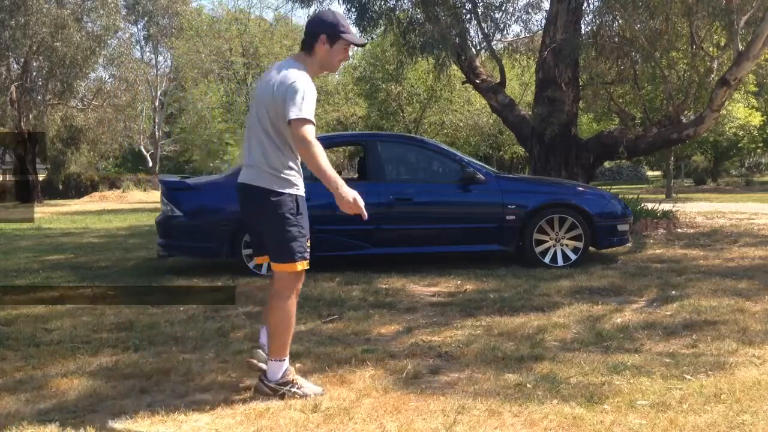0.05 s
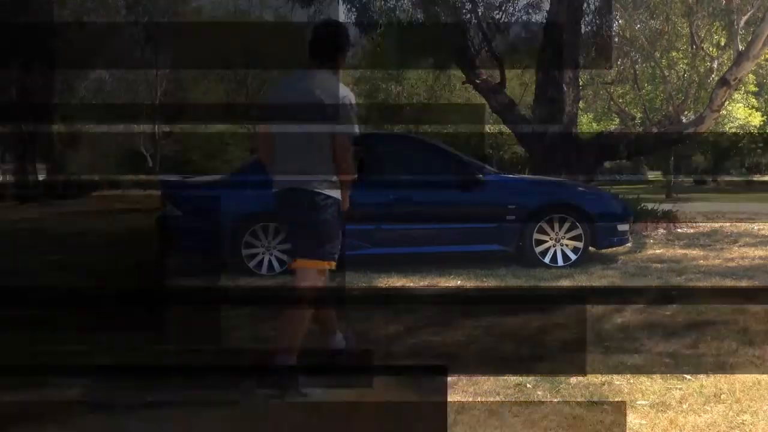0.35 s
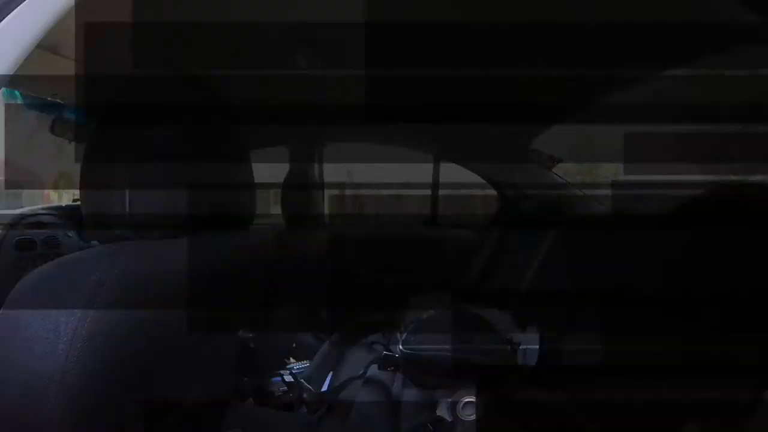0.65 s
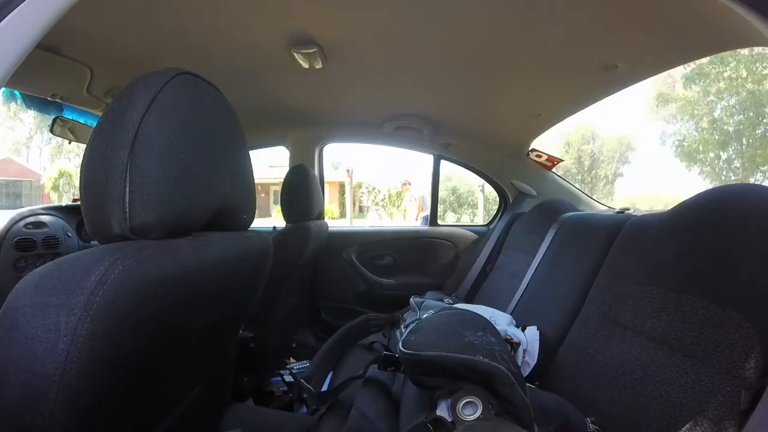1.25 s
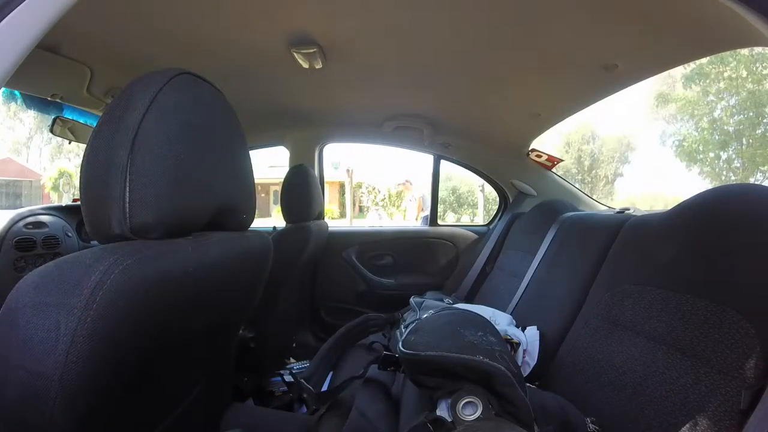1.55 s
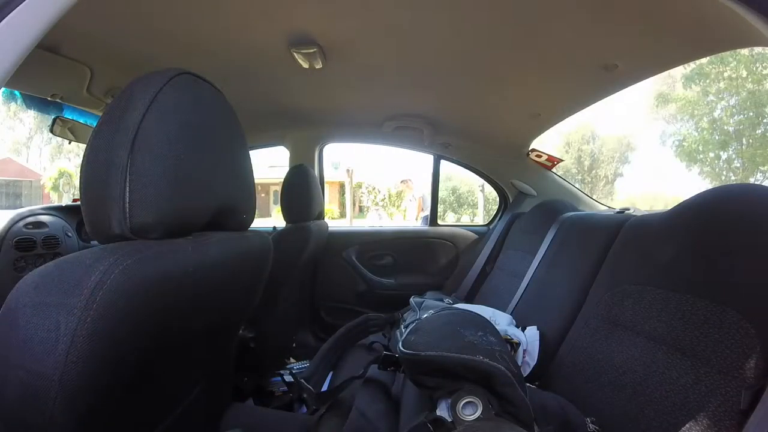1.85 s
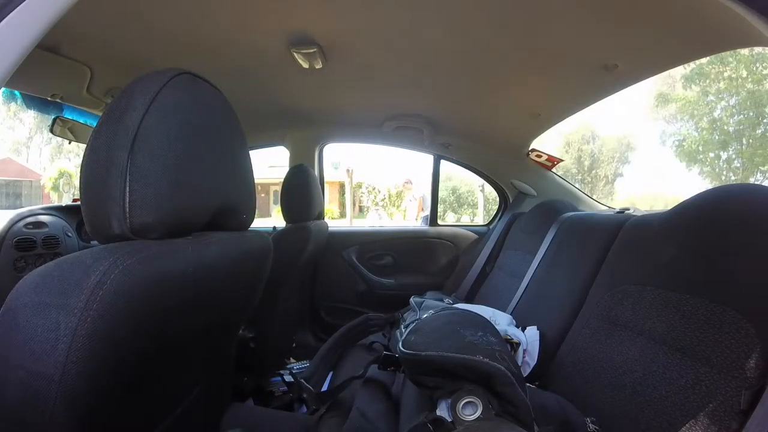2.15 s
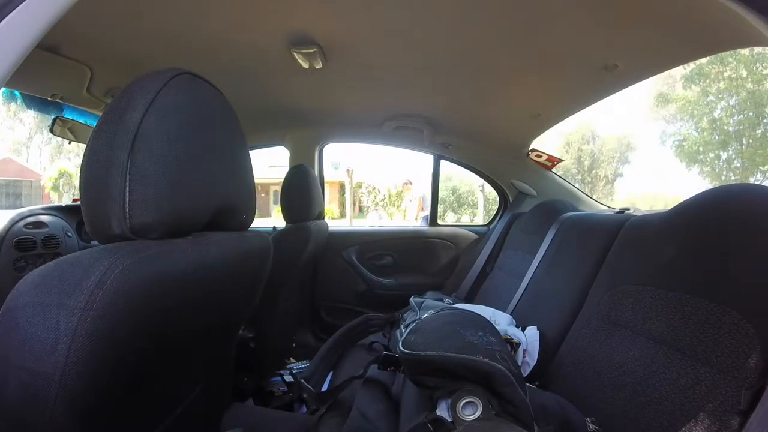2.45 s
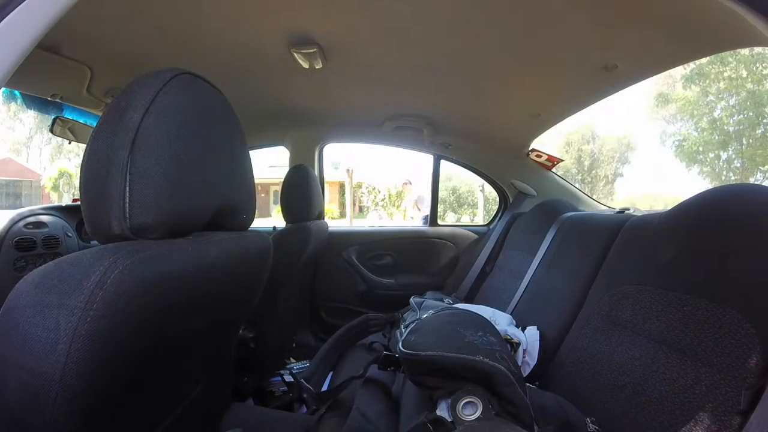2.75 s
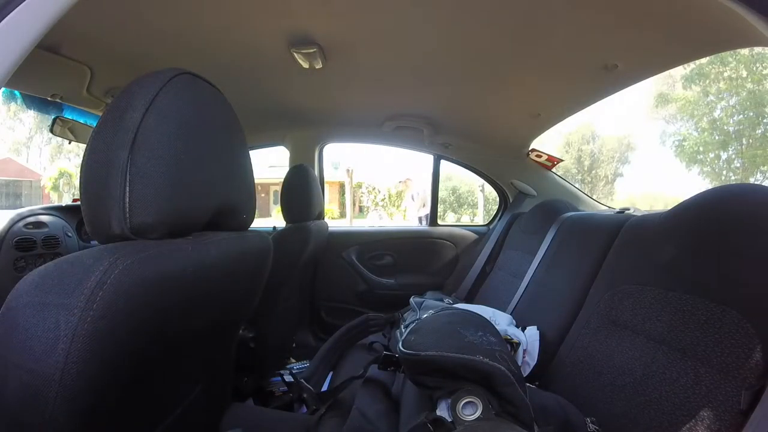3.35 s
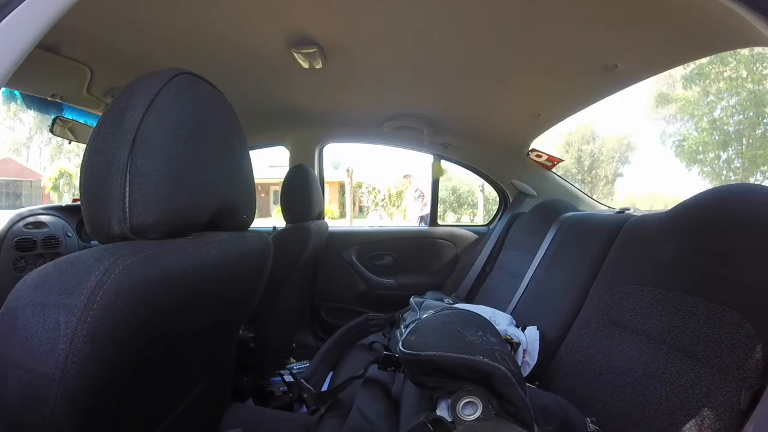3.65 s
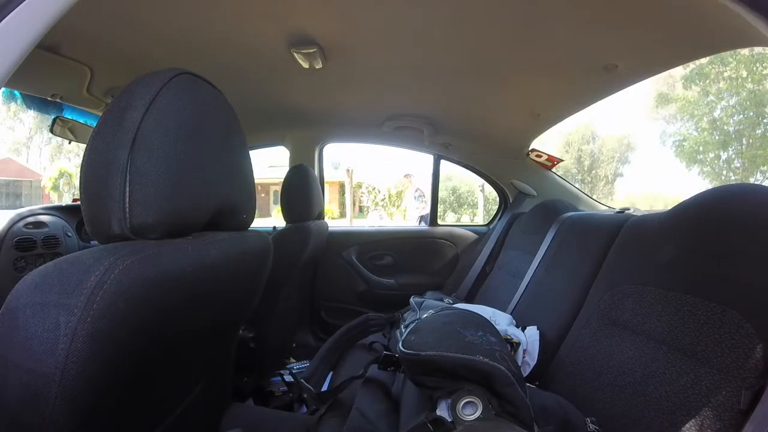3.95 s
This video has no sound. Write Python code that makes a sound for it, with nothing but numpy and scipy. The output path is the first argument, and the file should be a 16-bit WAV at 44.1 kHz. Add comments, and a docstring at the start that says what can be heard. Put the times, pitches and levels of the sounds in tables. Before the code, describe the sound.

From a car seat in a quiet garden, faint birds whistle and tweet over a light breeze. A distant knock sounds, then a ball slams into the car's body with a crack and a deep thump.

```python
"""Ball hits a parked car

A quiet garden with far birds: faint rumble and hiss give way to a leafy breeze, heard from a car seat.
A distant knock sends a ball on its way, and half a second later it slams into the car.
The struck panel cracks, rattles and rings, the shell thumps and the cabin booms."""
import sys
import numpy as np
from scipy import signal
from scipy.fft import rfft, irfft
from scipy.io import wavfile
from scipy.ndimage import uniform_filter1d

SR = 44100
rng = np.random.default_rng(int(sys.argv[2]) if len(sys.argv) > 2 else 0)


def int16_out(signal):
    """Quantize to a 16-bit WAV file."""
    q = np.round(np.clip(np.atleast_2d(signal).T, -1, 1) * 32767)
    wavfile.write(sys.argv[1], SR, q.astype(np.int16))


N = 176400


def undb(db):
    """Decibels to gain."""
    return 10 ** (np.asarray(db) / 20)


def unit(x):
    """Scale to rms 1."""
    return x / np.sqrt(np.mean(x ** 2))


def since(start):
    """Seconds since a moment, zero before it."""
    return np.maximum(np.arange(N) / SR - start, 0)


def ramp(start, end):
    """Linear fade from 0 to 1 between two moments."""
    return np.minimum(since(start) / (end - start), 1)


def strike(start, t60, attack):
    """Percussive envelope: an attack, then an exponential decay."""
    age = since(start)
    return (1 - np.exp(-age / attack)) * np.exp(-np.log(1000) * age / t60)


def ring(start, hz, db, t60, attack=.0001):
    """One struck mode: a decaying sine."""
    return undb(db) * strike(start, t60, attack) * np.sin(2 * np.pi * hz * since(start))


def noise(colour):
    """Noise of rms 1, shaped by an EQ curve of (frequency [Hz], level [dB]) points."""
    hz, db = np.array(colour, float).T
    bin_hz = np.maximum(np.arange(N // 2 + 1) * SR / N, 1)
    eq = undb(np.interp(np.log(bin_hz), np.log(hz), db))
    return unit(irfft(rfft(rng.standard_normal(N)) * eq, N))


def drift(rate_hz):
    """Smooth random modulation of rms 1."""
    step = int(SR / rate_hz)
    held = np.repeat(rng.standard_normal(N // step + 1), step)
    return unit(uniform_filter1d(held, step)[:N])


def sing(out, start, hz, db):
    """Mix in one bird note: a sine that follows a pitch curve, with soft edges."""
    envelope = np.sqrt(2 * signal.windows.tukey(len(hz), .35))
    note = undb(db) * envelope * np.sin(2 * np.pi * np.cumsum(hz) / SR)
    onset = int(start * SR)
    out[onset:onset + len(note)] += note[:N - onset]


# slaps of ball on panel within the one hit (time [s], gain [dB])
SLAPS = [(3.92157, -15.8), (3.92478, -3.9), (3.92529, 1.8), (3.92803, -8.5), (3.92952, 1.0)]
# EQ of each slap's dry crack (frequency [Hz], relative level [dB])
CRACK_EQ = [(200, -3), (1000, 3), (2500, -2), (4200, -2.5), (6000, -1), (8000, -8), (10000, -22),
            (12500, -18), (15000, -44)]
# each slap's sharp snap (frequency [Hz], relative level [dB], t60 [s])
SNAP_MODES = [(1011.0, -15.1, 0.0067), (2455.0, -16.8, 0.0466), (3771.0, -8.8, 0.0106),
              (4346.0, 0.1, 0.0038), (4811.0, -17.2, 0.0134)]
# the panel's ring-out (frequency [Hz], level [dB], t60 [s])
PANEL_MODES = [(497.0, -18.9, 0.0642), (609.0, -13.8, 0.0848), (802.0, -15.3, 0.0529),
               (910.0, -19.7, 0.0438), (1033.0, -11.0, 0.0475), (1233.0, -19.4, 0.0418),
               (1369.0, -17.1, 0.0464), (1608.0, -9.2, 0.0221), (1836.0, -33.8, 0.1591),
               (2102.0, -19.1, 0.0473), (2785.0, -8.8, 0.0214), (3549.0, -30.1, 0.0343),
               (3662.0, -20.3, 0.0444), (4060.0, -28.9, 0.0445)]
CRACK_DB, CRACK_T60_S, SLAP_ATTACK_S, PANEL_S = -13.5, .0085, .00016, 3.9232


def panel_hit():
    """The ball slaps the panel five times within ten milliseconds; the panel rings on."""
    crack = undb(CRACK_DB) * noise(CRACK_EQ)
    out = sum(ring(PANEL_S, *mode, attack=.0005) for mode in PANEL_MODES)
    for start, db in SLAPS:
        snap = sum(ring(start, *mode, SLAP_ATTACK_S) for mode in SNAP_MODES)
        out += undb(db) * (crack * strike(start, CRACK_T60_S, SLAP_ATTACK_S) + snap)
    return out


# soft pushes as the shell gives way (time [s], length [s], level before the low cut [dB])
SHELL_PUSHES = [(3.93308, 0.0015, -5.0), (3.93658, 0.0011, -4.3)]


def shell_thump():
    """The shell flexes under the ball in two rounded pressure pulses."""
    pulses = sum(-undb(db) * np.sin(np.pi * np.minimum(since(start) / length, 1)) ** 2
                 for start, length, db in SHELL_PUSHES)
    low_cut = signal.butter(1, 120, "high", fs=SR, output="sos")
    return signal.sosfilt(low_cut, pulses)


# low modes of the shell and cabin air (time [s], frequency [Hz], level [dB], t60 [s])
BOOM_MODES = [(3.9297, 100.0, -6.9, 0.1654), (3.9363, 94.0, -1.8, 0.0592), (3.9261, 216.0, -17.0, 0.15),
              (3.9273, 258.0, -27.3, 0.1692), (3.9265, 352.0, -17.7, 0.1049), (3.9292, 32.0, -21.1, 0.1008)]
BOOM_ATTACK_CYCLES = .9


def cabin_boom():
    """The body of the hit: low modes build up over about a cycle, then die away."""
    return sum(ring(start, hz, db, t60, BOOM_ATTACK_CYCLES / hz) for start, hz, db, t60 in BOOM_MODES)


# bands of scattered sound in the cabin
# (low edge [Hz], high edge [Hz], early level [dB], early t60 [s], late level [dB], late t60 [s])
TAIL_BANDS = [(152, 640, -28, 0.061, -35, 0.22), (710, 2030, -24, 0.056, -38.5, 0.16),
              (2200, 5900, -29, 0.047, -44.5, 0.19), (5970, 13000, -38, .04, -52, .17)]
TAIL_S, TAIL_ATTACK_S = 3.924, .0026


def cabin_tail():
    """A short noise tail: the hit scatters round the cabin and the seats soak it up."""
    out = np.zeros(N)
    for low, high, early_db, early_t60, late_db, late_t60 in TAIL_BANDS:
        band_pass = signal.butter(3, [low, high], "band", fs=SR, output="sos")
        wash = unit(signal.sosfilt(band_pass, rng.standard_normal(N)))
        early = undb(early_db) * strike(TAIL_S, early_t60, TAIL_ATTACK_S)
        late = undb(late_db) * strike(TAIL_S, late_t60, TAIL_ATTACK_S)
        out += wash * (early + late)
    return out


def sub_thud():
    """A soft, very low thud just ahead of the hit."""
    return ring(start=3.782, hz=25, db=-27.5, t60=.27, attack=.015)


# modes of the far knock (frequency [Hz], level [dB], t60 [s])
KNOCK_MODES = [(1880, -29, .012), (2250, -37, .008), (4400, -47, .006), (975, -47, .05), (480, -47, .04),
               (270, -49, .05), (105, -37, .07)]
KNOCK_S = 3.386


def far_knock():
    """The knock that launches the ball: a woody click over a dull thud."""
    return sum(ring(KNOCK_S, *mode) for mode in KNOCK_MODES)


# whistled bird notes (time [s], length [s], start pitch [Hz], end pitch [Hz],
# glide bend [0 straight, higher settles sooner], warble depth [Hz], level [dB])
WHISTLE_NOTES = [(0.161, 0.058, 2500, 1950, 1.56, 130, -76), (0.249, .13, 2000, 1890, 2.8, 30, -85),
                 (1.583, .03, 2300, 1644, 0.84, 30, -64.5), (1.62, .085, 1640, 2080, 0.092, 64, -68),
                 (1.695, .14, 2180, 2283, 1.6, 200, -63), (1.825, .04, 2540, 2330, .3, 15, -65),
                 (1.86, .13, 2320, 2225, 4, 5, -58), (3.26, .045, 2320, 1920, 1.2, 10, -65.5),
                 (3.325, 0.046, 2340, 2080, .2, 10, -61.5), (3.36, .125, 1710, 2156, 0.11, 18, -62.5),
                 (3.432, .093, 2500, 1880, 0.61, 14, -63), (3.54, .035, 2450, 2070, .2, 10, -65.5),
                 (3.621, .21, 2580, 2200, 5, 5.4, -65), (3.75, 0.18, 2620, 2740, .5, 11, -74),
                 (3.116, .05, 4680, 4180, .1, 15, -68)]
WARBLE_RATE_HZ, WARBLE_ROUGHNESS = 41, .72


def bird_whistles(quiver):
    """Far birds whistle gliding notes with a rough warble."""
    out = np.zeros(N)
    for start, length, first_hz, last_hz, bend, depth_hz, db in WHISTLE_NOTES:
        progress = np.linspace(0, 1, int(length * SR))
        glide = first_hz + (last_hz - first_hz) * np.expm1(-bend * progress) / np.expm1(-bend)
        warble = np.sin(2 * np.pi * WARBLE_RATE_HZ * length * progress)
        jitter = WARBLE_ROUGHNESS * quiver[int(start * SR):][:len(progress)]
        sing(out, start, glide + depth_hz * (warble + jitter), db)
    return out


# small birds' tweets (time [s], length [s], pitch [Hz], glide [Hz], level [dB])
TWEET_NOTES = [(0.346, .04, 6250, 245, -73), (.447, 0.033, 6700, -200, -74.5), (0.477, .04, 6900, 245, -77),
               (0.551, 0.054, 6150, 450, -70.5), (.645, .025, 6250, -400, -72),
               (0.665, 0.03, 6250, 250, -72), (0.708, .03, 7000, -50, -74),
               (.758, 0.033, 6030, -200, -70.5), (.79, .025, 7000, -300, -78),
               (.845, 0.045, 5950, 400, -73), (.89, 0.07, 6780, 100, -70.5), (.955, .04, 5700, 50, -72),
               (1.036, .05, 6450, 300, -69.5), (1.105, 0.042, 6650, 150, -70),
               (1.232, .04, 6750, -300, -70), (1.424, .03, 6700, 200, -67), (1.624, .03, 6700, 300, -69.5),
               (1.83, .05, 7040, -500, -68.5), (2.026, 0.041, 6700, 204, -72),
               (2.23, .05, 6900, -900, -71.5), (2.31, .05, 6400, 397, -74), (2.405, .025, 6800, 200, -69),
               (2.485, 0.062, 6400, -500, -70), (2.535, .03, 6530, 400, -73), (2.708, .035, 7000, 100, -70),
               (2.845, .025, 6070, 300, -71), (2.895, .03, 6900, 200, -71), (3.08, .035, 6900, 147, -74)]
BUZZY_FROM_S, CLEAR_JITTER_HZ, BUZZY_JITTER_HZ = .82, 110, 300


def bird_tweets(quiver):
    """Thin, high chirps; deeper pitch jitter makes the later ones buzzier."""
    out = np.zeros(N)
    for start, length, hz, glide_hz, db in TWEET_NOTES:
        progress = np.linspace(0, 1, int(length * SR))
        depth_hz = BUZZY_JITTER_HZ if start > BUZZY_FROM_S else CLEAR_JITTER_HZ
        jitter = depth_hz * quiver[int(start * SR):][:len(progress)]
        sing(out, start, hz + glide_hz * progress + jitter, db)
    return out


def tree_reverb(song, wet_db=-10, t60=.3):
    """The trees scatter the birdsong, adding a soft tail to the direct sound."""
    impulse = unit(rng.standard_normal(N) * strike(0, t60, attack=.0093)) / np.sqrt(N)
    return song + undb(wet_db) * signal.fftconvolve(song, impulse)[:N]


def flock_chatter(count=30, from_s=.85, until_s=3.0, note_s=.05, pitch_hz=6500, spread_hz=420):
    """The rest of the flock: faint buzzy tweets that thin out with time."""
    out, quiver = np.zeros(N), drift(500)
    for when, detune in zip(rng.random(count), rng.standard_normal(count)):
        start = from_s + (until_s - from_s) * when ** 2
        jitter = BUZZY_JITTER_HZ * quiver[int(start * SR):][:int(note_s * SR)]
        sing(out, start, pitch_hz + spread_hz * detune + jitter, db=-80)
    return out


# EQ of the breeze in the leaves (frequency [Hz], relative level [dB])
BREEZE_EQ = [(12, -26), (20, -2.5), (49, 0), (80, -2), (205, -6.5), (377, -10.5), (555, -12.5),
             (1240, -18.5), (2100, -21.5), (4690, -28.5), (6720, -31), (7930, -35), (13400, -45.5),
             (15000, -48)]
BREEZE_DB, SWELL_DB, FLICKER_DB, BREEZE_FADE_IN_S = -54, .41, .5, (.19, .91)


def breeze():
    """A bed of rustling leaves fades in; its octaves swell together and flicker separately."""
    spectrum = rfft(noise(BREEZE_EQ))
    swell_db = SWELL_DB * drift(4.2)
    bin_hz = np.arange(N // 2 + 1) * SR / N
    octave = np.log2(np.clip(bin_hz / 32, 1, 512))  # octaves above 32 Hz
    leaves = np.zeros(N)
    for centre in range(10):
        band = irfft(spectrum * np.maximum(1 - abs(octave - centre), 0), N)
        leaves += band * undb(swell_db + FLICKER_DB * drift(22.025))
    return undb(BREEZE_DB) * leaves * ramp(*BREEZE_FADE_IN_S) ** 1.02


# EQ of the outdoor rumble and microphone hiss (frequency [Hz], relative level [dB])
FLOOR_EQ = [(15, -45), (25, -15), (37, -14), (49, 1.5), (69, 0.5), (93, -9), (383, -27), (729, -26),
            (879, -29.5), (2430, -29.5), (2930, -28.5), (4750, -29.5), (7090, -32), (9020, -32.5),
            (15000, -33)]
FLOOR_DB, FLOOR_FADE_OUT_S = -63, (.29, .82)


def noise_floor():
    """Faint outdoor rumble with steady microphone hiss, fading out."""
    return undb(FLOOR_DB) * noise(FLOOR_EQ) * (1 - ramp(*FLOOR_FADE_OUT_S))


def scene():
    """Mono mix: the hit and its lead-in over the birds and the ambience bed."""
    bed = breeze() + noise_floor()
    quiver = drift(500)  # fast pitch jitter for the birds
    birds = tree_reverb(bird_whistles(quiver) + bird_tweets(quiver))
    hit = panel_hit() + shell_thump() + cabin_boom() + cabin_tail()
    return (hit + sub_thud() + far_knock() + birds + flock_chatter() + bed)[None]


def record(dry):
    """Master chain: soft-clip the loudest peaks, then a steep high cut."""
    rounded = dry / (1 + dry ** 12) ** (1 / 12)
    high_cut = signal.ellip(10, .1, 80, 15100, fs=SR, output="sos")
    return signal.sosfilt(high_cut, rounded)


dry = scene()
out = record(dry)
int16_out(out)
```